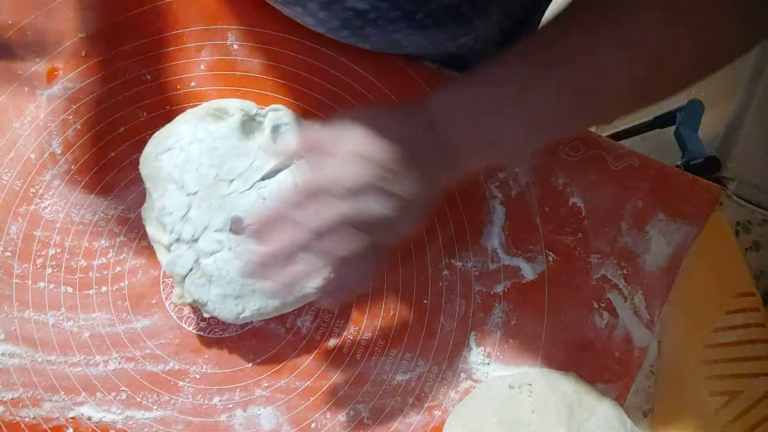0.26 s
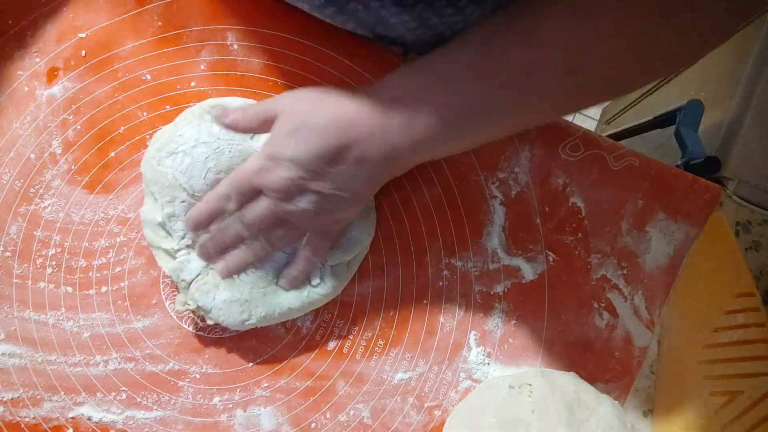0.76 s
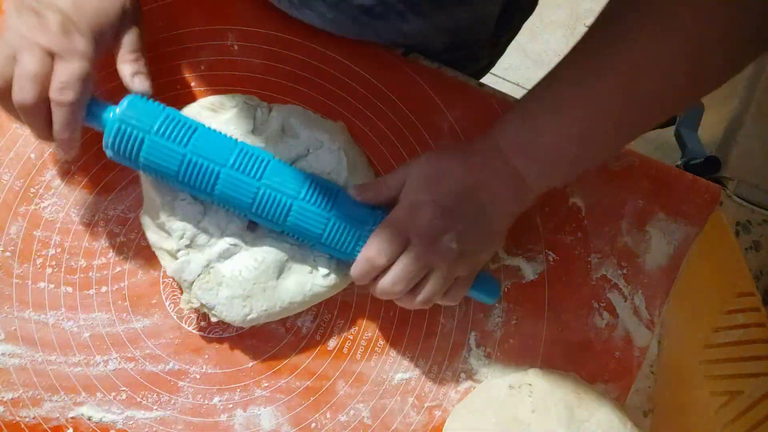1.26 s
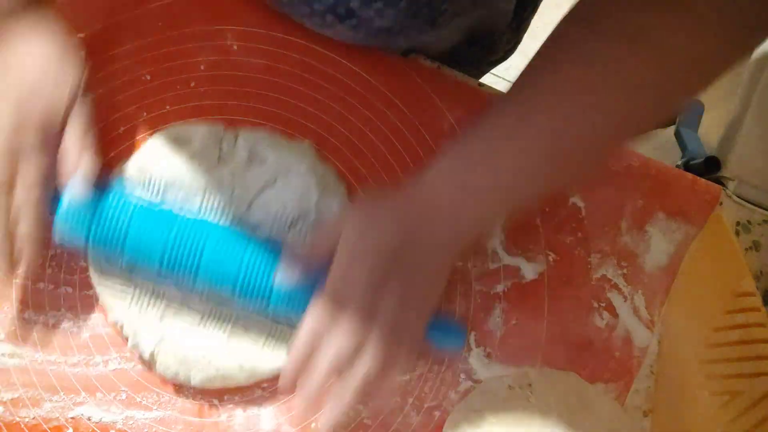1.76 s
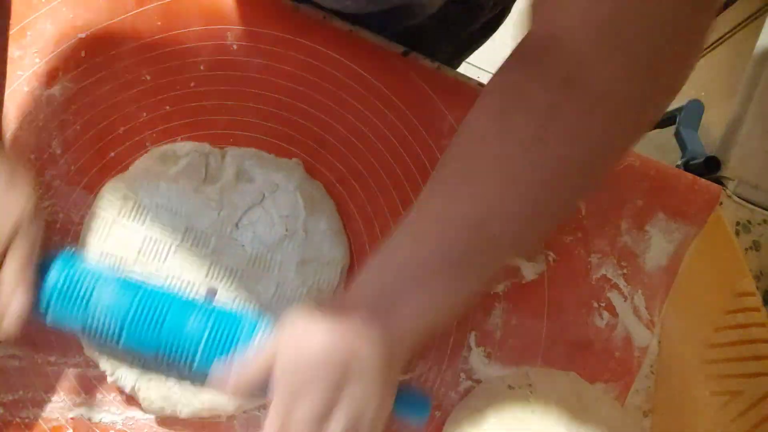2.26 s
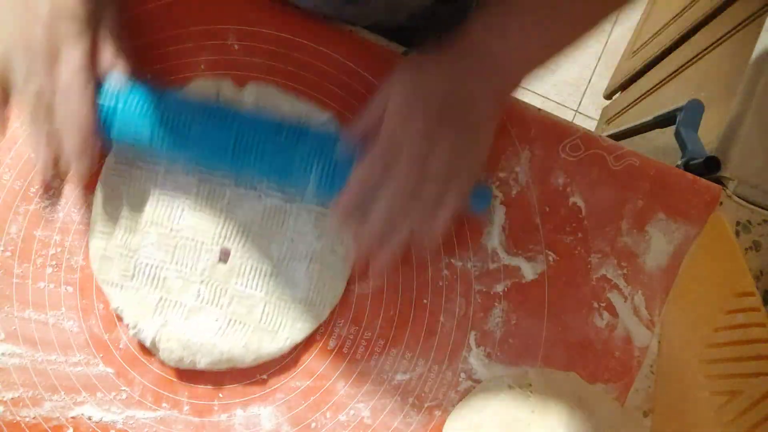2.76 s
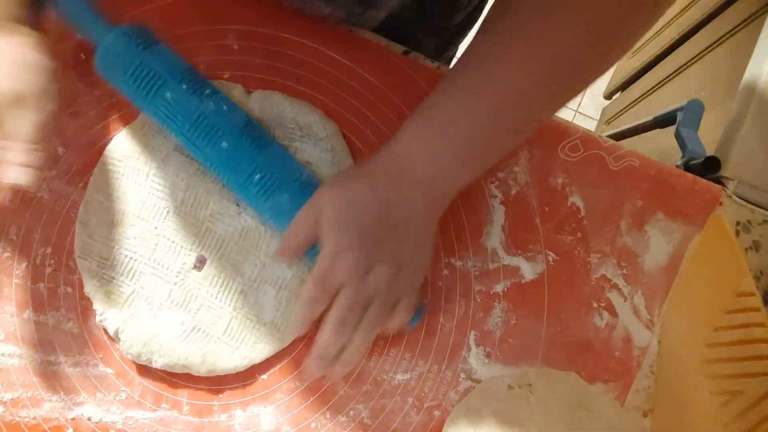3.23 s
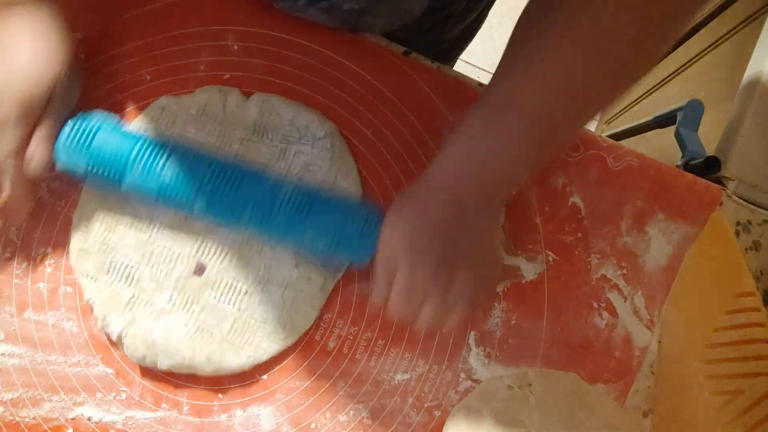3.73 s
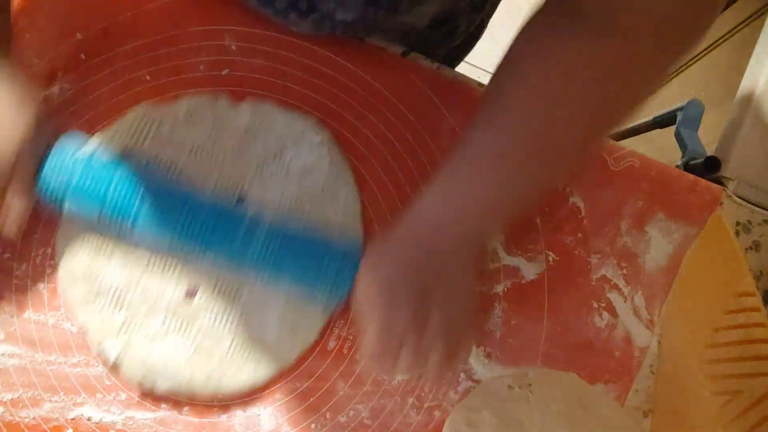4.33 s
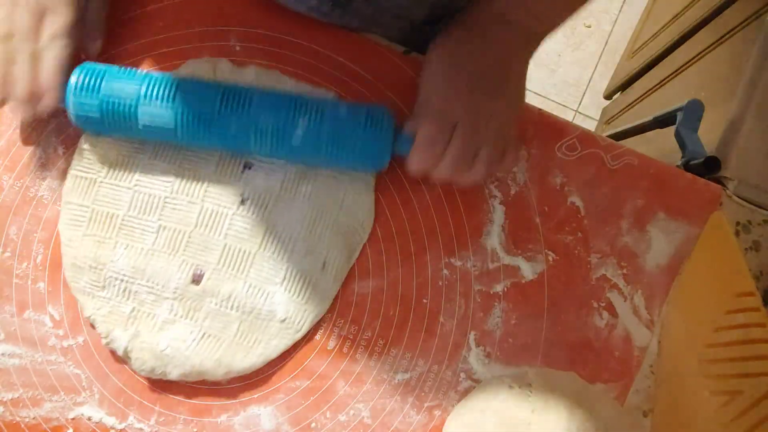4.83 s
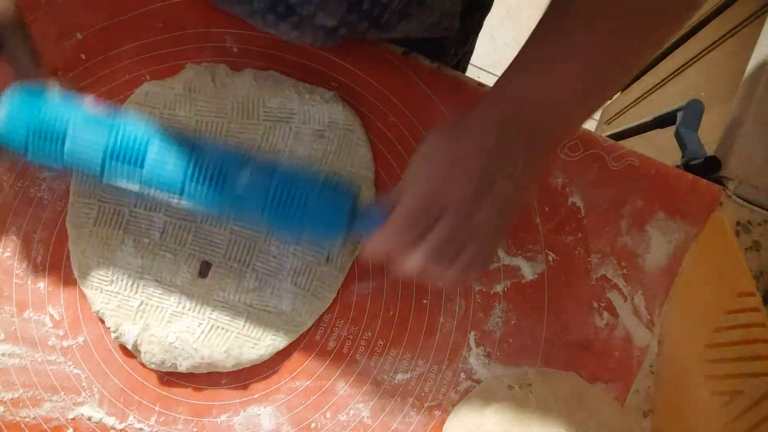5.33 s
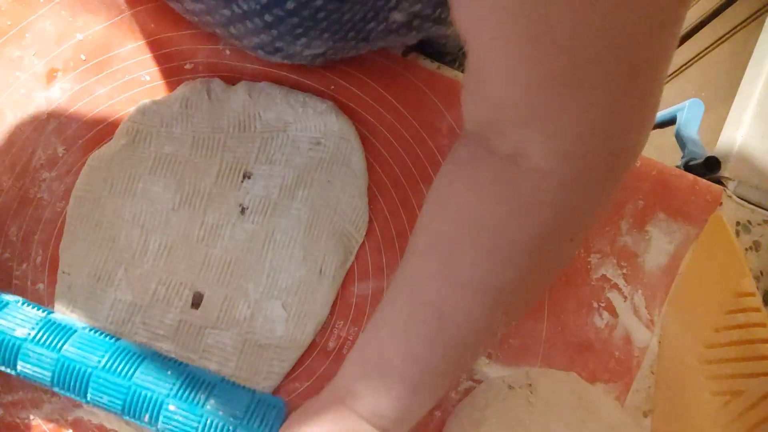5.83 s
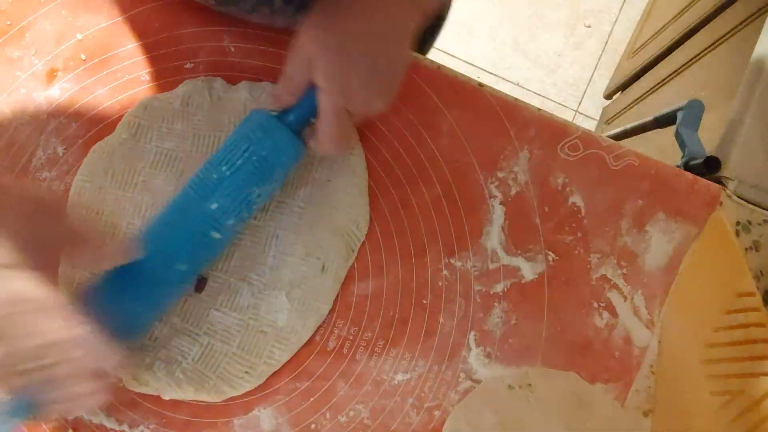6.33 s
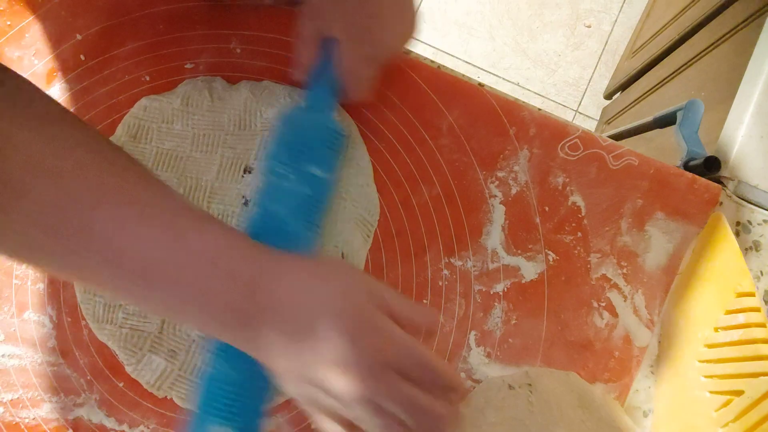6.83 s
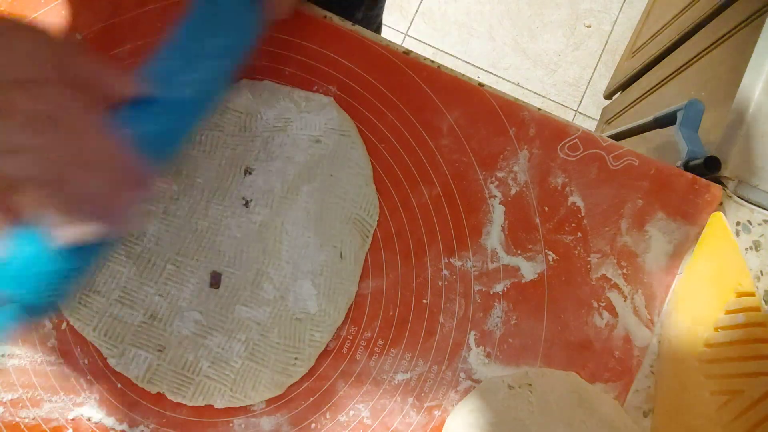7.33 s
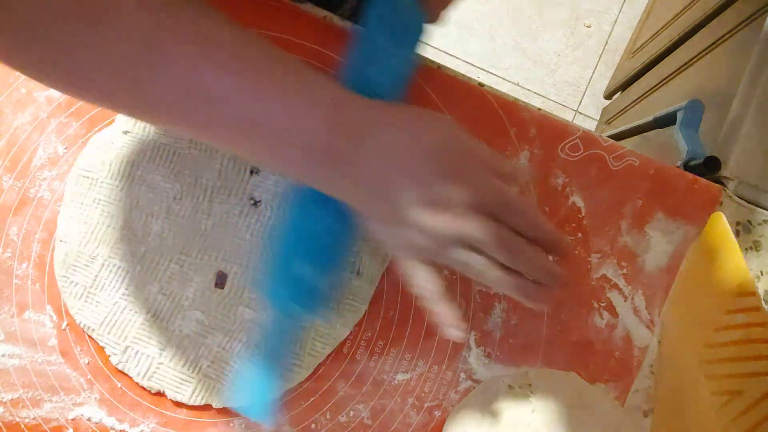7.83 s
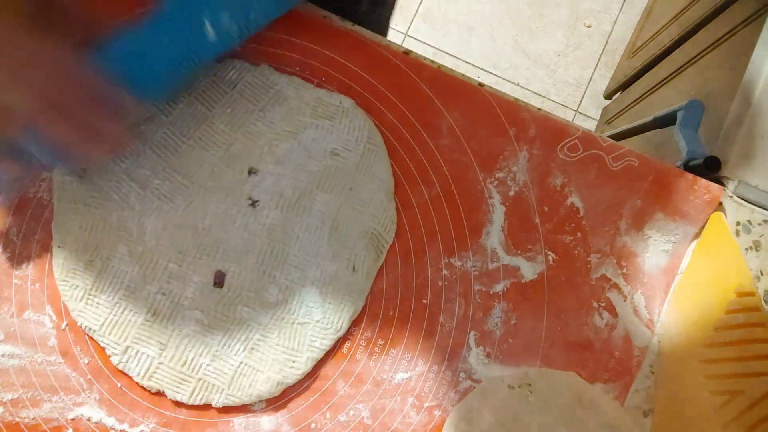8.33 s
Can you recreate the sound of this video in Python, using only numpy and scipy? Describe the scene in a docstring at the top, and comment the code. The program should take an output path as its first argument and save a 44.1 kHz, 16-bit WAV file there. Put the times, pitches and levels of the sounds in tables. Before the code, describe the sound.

A ribbed plastic rolling pin rumbles back and forth over floured dough, with hollow clacks and table thumps, above a throbbing refrigerator hum.

```python
"""A ribbed plastic rolling pin works dough on a floured mat in a kitchen, close to a phone's microphone.
Each stroke is filtered random slips: ribs rumble, the barrel rubs, flour hisses; hands pat and brush too.
Handles clack (snap and rattle through the hollow shell) and squeak (short rising tones); now and then
the pin drops and thumps the table, ringing its modes.
Behind, a compressor, probably a refrigerator's, throbs against the mains hum over a low rush of noise."""
import sys
import numpy as np
from scipy import signal
from scipy.fft import rfft, irfft, next_fast_len
from scipy.io import wavfile

SR = 44100
rng = np.random.default_rng(int(sys.argv[2]) if len(sys.argv) > 2 else 0)


def store_pcm(level_fs):
    """Save levels as 16-bit WAV."""
    pcm = np.round(np.clip(level_fs, -1, 1) * 32767).astype(np.int16)
    wavfile.write(sys.argv[1], SR, np.atleast_2d(pcm).T)


N = 378368
TIME = np.arange(N) / SR  # seconds

# Strokes of the pin over the dough. Each row: start in seconds, speeding up in seconds, slowing down in
# seconds, then rumble of the ribs, rubbing on dough and hiss of flour in dB, before the trims in rolling().
STROKES = [(0.95, 0.38, 0.16, -56, -65.5, -64), (1.31, 0.1, 0.18, -46.5, -58.5, -58.5),
           (1.579, 0.16, 0.11, -48.5, -65, -64.0), (1.834, 0.14, 0.2, -50, -65, -61.5),
           (2.14, 0.18, 0.21, -50.5, -64.5, -64), (2.515, 0.27, 0.084, -56, -69, -66.5),
           (2.864, 0.18, 0.15, -45.5, -57, -55.5), (3.6, 0.23, 0.13, -53, -63, -64),
           (3.899, 0.21, 0.085, -48, -64, -64.5), (4.176, 0.14, 0.16, -48.5, -61.5, -62.5),
           (4.48, 0.13, 0.19, -45, -62.5, -62), (4.675, 0.05, 0.21, -49.5, -56.5, -60),
           (4.86, 0.083, 0.25, -54.5, -61.5, -67), (5.36, 0.17, 0.7, -57.5, -65.5, -66.5),
           (5.868, 0.033, 0.2, -73, -67, -68), (5.977, 0.26, 0.093, -57, -64.5, -67),
           (6.303, 0.032, 0.1, -48, -62, -64), (6.369, 0.11, 0.31, -57.0, -59, -60),
           (6.858, 0.021, 0.23, -53.5, -58, -60.5), (6.94, 0.12, 0.22, -53.5, -59, -66),
           (7.335, 0.12, 0.33, -58.5, -65.5, -66.5), (7.856, 0.026, 0.2, -48, -58.5, -64),
           (7.93, 0.17, 0.56, -59.5, -69, -68)]
# Brushes of a hand over dough or pin. Each row: start in seconds, speeding up in seconds, slowing down in
# seconds, then rubbing and hiss of flour in dB, before the same trims.
BRUSHES = [(-.016, 0.014, 0.18, -63, -64), (.371, 0.17, 0.072, -79, -70), (.56, 0.011, 0.067, -76, -69.5),
           (.685, .027, 0.028, -81, -68), (.914, .014, 0.022, -67, -69), (.955, .017, 0.014, -69, -64),
           (2.483, .042, 0.071, -67, -65), (3.11, 0.034, .04, -66, -74), (3.283, 0.018, 0.1, -63.5, -67.5),
           (4.375, 0.034, 0.014, -61, -59.5), (6.64, 0.044, 0.028, -57.5, -71),
           (8.137, 0.06, 0.034, -63, -61.5), (8.275, 0.079, 0.073, -69, -62), (8.52, 0.036, .03, -70, -67)]
# Exponents of speed (no unit) by which contact power grows, in the order ribs, rubbing, flour.
SPEED_LAW = (1.21, 0.97, 1.0)
PALM_RUMBLE_DB = 5  # rumble under a brushing hand, above its rubbing
GRIP_S = 0.92  # the hands leave the dough and take the pin
# Ribs, rubbing and flour between strokes, in dB: hands pressing the dough, then the pin creeping on it.
PRESSING_DB, CREEPING_DB = (-68.5, -80.5, -83), (-66.5, -73.5, -76)
# Colours of the ribs, the rubbing and the flour. Each row: frequency in Hz, density in dB per Hz.
RUMBLE = [(60, -16.5), (150, -4.5), (300, 3), (450, 1.5), (700, -1), (900, -2), (1150, -7.5), (2000, -33),
          (8000, -56)]
RUB = [(300, -32), (800, -2.5), (1150, 4.5), (1500, 9), (2300, 4.5), (3400, -8.5), (4500, -18.5),
       (8000, -29)]
FLOUR = [(1000, -36), (2800, -4), (3900, 0.5), (5000, 1), (6200, 2.5), (7500, 5.5), (9000, -40.5)]
# Resonances of the hollow pin. Each row: frequency in Hz, width in Hz, lift in dB.
PIN = [(599, 47, 5.5), (767, 130, 5.5), (916, 96, 3), (1087, 340, -4), (1390, 50, 1.5), (1570, 51, 1.5),
       (1640, 510, -5.5), (1980, 350, -0.5), (3400, 270, 2.5)]
# Hum lines, each a sum of two rhythms. Each row: multiple of the shaft's turning, multiple of the mains
# buzz, level in dB rms.
HUM_LINES = [(2, 0, -54), (0, 1, -47.5), (3, 0, -53), (1, 1, -65), (4, 0, -60.5), (2, 1, -65.5),
             (5, 0, -57.5), (0, 2, -75), (6, 0, -55.5), (2, 2, -65.5), (8, 0, -50), (11, -1, -56.5),
             (9, 0, -61.5), (12, -1, -70), (12, 0, -76.5), (8, 2, -66.5), (7, 3, -67)]
# The compressor's turning rate. Each row: time in seconds, turns per second.
SHAFT = [(0, 36.23), (2, 36.24), (2.6, 36.29), (5, 36.315), (8.58, 36.32)]
BUZZ_HZ, THROB_AT_S = 100.02, 4.012  # mains buzz; a moment when it is in step with the shaft
# Colour of the kitchen's rush. Each row: frequency in Hz, density in dB per Hz.
ROOM = [(20, -40.5), (35, -17), (50, -9), (70, -3.5), (100, -4.5), (122, -6), (175, -1), (240, -10),
        (300, -3.5), (400, -14), (600, -18), (1100, -33.5), (3000, -47), (7500, -50.5)]
# Blows on the table. Each row: start in seconds, then in dB a push near 50 Hz, boom near 100 Hz,
# body near 180 Hz, knock near 350 Hz and rap near 620 Hz.
THUMPS = [(0.0, -22, -42, -10, -37, -46), (.374, -32, -44, -29, -27.5, -45),
          (1.236, -43, -41, -27.5, -29, -35), (2.299, -42, -35, -32, -34, -46),
          (3.0653, -18, -22, -21, -26, -31), (5.377, -43, -15.5, -22.5, -30.5, -17.5),
          (6.808, -46, -29, -41, -34, -49), (6.872, -38.5, -18, -14, -24, -35.5),
          (7.379, -23, -14, -62, -20.5, -35), (7.8956, -34, -16.5, -0.5, -14, -21.5)]
# Modes of the table. Each row: frequency in Hz, level in dB, undamped 60 dB decay in seconds.
TABLE_MODES = [(56, -4, 0.13), (74.5, -15, 0.43), (98.3, -1.5, 0.42), (133.1, -7.5, 0.33),
               (184.4, -7.5, 0.11), (220, -20.5, 0.1), (255, -17.5, 0.18), (360.5, -9, 0.14),
               (405, -7.5, 0.062), (529, -4.5, 0.062), (626.5, -13, 0.13), (850, -16.5, 0.068)]
# Clacks of the pin. Each row: start in seconds, strength in dB, strongest frequency in Hz, fall above it
# in dB per octave, rattle relative to the snap in dB.
CLACKS = [(.002, -5, 700, 8, 9.5), (0.3724, -8.5, 1800, 9, -3.5), (.376, -12, 900, 7.5, -3),
          (1.2365, -12, 600, 12, -8), (1.881, -20, 600, 6, 2), (2.639, -9.5, 620, 18, 3),
          (2.770, -12.5, 700, 14, 6), (3.055, -3.5, 1550, 25, 12), (3.063, 2, 1350, 12, 1),
          (3.071, 9, 800, 15, -2.5), (3.316, -12, 1000, 21, 4), (4.001, -21, 700, 9, -2),
          (4.039, -2, 700, 21, 1.5), (4.110, -6, 1400, 20, -1.5), (4.513, 2, 1340, 28, 0),
          (4.682, 1.5, 1300, 15.5, -1), (4.953, -6, 680, 12, 4.5), (5.095, -16, 750, 9, 8.5),
          (5.377, -7, 650, 6, 8.5), (6.021, -12.5, 1500, 12.5, 1.5), (6.273, -17.5, 700, 12, -4),
          (6.325, -27.5, 700, 2, 10), (6.808, -11, 890, 18, 1.5), (6.870, -8, 1100, 15.5, 6.5),
          (7.044, 4, 1400, 34, -5), (7.36, -5, 670, 10.5, 5.5), (7.379, -10, 662, 3.5, 3),
          (7.881, -6.5, 700, 10, 5), (7.897, -2.5, 650, 4.5, 1.5), (7.902, 4, 646, 47, -1),
          (7.978, -20, 900, 10, -7)]
LOW_SLOPE_SHARE = 0.62  # a clack falls away more gently on its bass side
CREST_OCTAVES = 0.068  # width of the rounded top of a clack's colour
# Squeaks of the handle on its axle. Each row: start in seconds, length in seconds, middle pitch in Hz,
# peak in dB.
SQUEAKS = [(1.24, .04, 5950, -56), (1.284, .03, 5970, -57.5), (1.344, .018, 6020, -58),
           (3.797, .02, 6110, -53.5), (7.455, .04, 4420, -67), (8.29, .03, 5000, -63)]
EDGE_HZ = 7680  # top of the phone's band


def amp(db):
    """Decibels to gain."""
    return 10 ** (np.asarray(db) / 20)


def unit(x):
    """Scales to rms 1."""
    return x / np.sqrt(np.mean(x ** 2) + 1e-20)


def read(points, hz):
    """Reads a spectrum on a log-frequency axis."""
    f, value = np.transpose(points)
    return np.interp(np.log(hz + 1), np.log(f + 1), value)


def colour(x, db_at):
    """Filters x, without phase shift, by a gain in dB given as a function of frequency."""
    size = next_fast_len(len(x) + 2048)
    gain = amp(db_at(np.fft.rfftfreq(size, 1 / SR)))
    return irfft(rfft(x, size) * gain, size)[:len(x)]


def struck(x, db_at):
    """Filters x by a gain in dB so that resonances ring only after their cause (minimum phase)."""
    size = 4096
    log_gain = np.log(amp(db_at(abs(np.fft.fftfreq(size, 1 / SR)))))
    response = np.fft.ifft(np.exp(np.conj(signal.hilbert(log_gain)))).real
    return signal.fftconvolve(x, response[:size // 2])[:len(x)]


def drift(rate_hz):
    """Slow random wandering of rms 1."""
    return unit(colour(rng.standard_normal(N), lambda f: -20 * np.log10(1 + (f / rate_hz) ** 4)))


def add(mix, s, sound):
    """Mixes a sound in at time s."""
    part = mix[max(round(s * SR), 0):][:len(sound)]
    part += sound[:len(part)]


def pin_db(hz):
    """The lift that the pin's shell gives to whatever excites it."""
    return sum(db / (1 + (2 * (hz - f) / width) ** 2) for f, width, db in PIN)


def friction(spectrum, per_s, spread_db, smooth):
    """Many tiny slips of uneven size over smooth sliding, heard through the pin."""
    sizes = amp(spread_db * np.minimum(rng.exponential(1, N), 4)) * rng.choice([-1, 1], N)
    slips = unit(sizes * (rng.random(N) < per_s / SR))
    sliding = smooth * rng.standard_normal(N)
    return unit(struck(slips + sliding, lambda f: read(spectrum, f) + pin_db(f)))


def speed(start, rise, fall):
    """A hand's speed, 0-1: it gathers smoothly from rest and comes smoothly back to rest."""
    return np.sin(np.pi * np.interp(TIME, np.cumsum([start, rise, fall]), [0, .5, 1])) ** 2


def contact():
    """Gains of ribs, rubbing and flour: motion adds power by its speed to that of the resting contact."""
    resting_db = np.where(TIME < GRIP_S, np.c_[list(PRESSING_DB)], np.c_[list(CREEPING_DB)])
    power = amp(resting_db) ** 2
    brushes = [(*timing, rub + PALM_RUMBLE_DB, rub, flour) for *timing, rub, flour in BRUSHES]
    for start, rise, fall, *levels in list(STROKES) + brushes:
        pace = speed(start, rise, fall)
        moving = (TIME > start) & (TIME < start + rise + fall)
        for layer, db, law in zip(power, levels, SPEED_LAW):
            layer[moving] += amp(db) ** 2 * pace[moving] ** law
    return np.sqrt(power)


def reflected(x, wet_db=-11, t60=.05):
    """Arms, table and cupboards throw back early echoes, whose pattern slowly wanders."""
    t = np.arange(SR // 10) / SR
    paths = rng.standard_normal((2, len(t))) * amp(-60 * t / t60)
    first, second = (signal.fftconvolve(x, path / np.linalg.norm(path))[:N] for path in paths)
    place = drift(rate_hz=1.3)  # radians of crossfade between the two echo patterns
    return x + amp(wet_db) * (np.cos(place) * first + np.sin(place) * second)


def rolling(rumble_db=0.75, rub_db=0.5, flour_db=2.5, uneven_db=1.8):
    """Ribs patter into the dough, the barrel rubs, and flour crunches under it; the dB trim each layer."""
    rumble, rub, flour = contact()
    pressure_db = uneven_db * drift(rate_hz=15)
    ribs = rumble * amp(rumble_db) * friction(RUMBLE, per_s=450, spread_db=2, smooth=.7)
    barrel = rub * amp(rub_db) * friction(RUB, per_s=1100, spread_db=3, smooth=1.2)
    grains = flour * amp(flour_db) * friction(FLOUR, per_s=2500, spread_db=3, smooth=1.4)
    return reflected((ribs + barrel + grains) * amp(pressure_db))


def compressor(waver_db=0.26):
    """Shaft orders and mains buzz mix; three shaft orders against one buzz beat about nine times a second."""
    turns = np.cumsum(np.interp(TIME, *np.transpose(SHAFT))) / SR
    turns = turns - np.interp(THROB_AT_S, TIME, turns)
    buzz = BUZZ_HZ * (TIME - THROB_AT_S)
    phases, out = rng.random(32), np.zeros(N)
    for shaft_order, buzz_order, db in HUM_LINES:
        k, m = round(shaft_order), round(buzz_order)
        # lines that beat together share a phase, so they are in step at THROB_AT_S
        cycle = k * turns + m * buzz + phases[(k + 3 * m) % len(phases)]
        level = np.sqrt(2) * amp(db + waver_db * drift(rate_hz=1.4))
        out += level * np.cos(2 * np.pi * cycle)
    return out


def room(level_db=-50):
    """The low steady rush of the kitchen: noise of a fixed colour."""
    return amp(level_db) * unit(colour(rng.standard_normal(N), lambda f: read(ROOM, f)))


def thumps(rise_s=0.00331, held_s=.054, damp_s=0.016):
    """Each blow rings the table's modes, weighted by where it lands, until the pressed dough damps them."""
    out, t = np.zeros(N), np.arange(SR // 4) / SR
    onset = 1 - np.exp(-(t / rise_s) ** 2)
    envelope = onset * np.exp(-np.maximum(t - held_s, 0) / damp_s)
    regions_hz = [50, 100, 180, 350, 620]
    for s, *levels in THUMPS:
        weight = list(zip(regions_hz, levels))
        for hz, db, t60 in TABLE_MODES:
            ringing = amp(db + read(weight, hz) - 60 * t / t60)
            velocity = envelope * ringing * np.sin(2 * np.pi * hz * (t - rise_s))
            add(out, s, np.gradient(velocity, t) / (2 * np.pi * hz))  # the board's acceleration radiates
    return out


def blow_db(hz, top_hz, fall_db):
    """The colour of one blow: a rounded top at top_hz, falling by the octave on either side."""
    octaves = np.log2((hz + 20) / top_hz)
    away = np.hypot(np.maximum(octaves, -LOW_SLOPE_SHARE * octaves), CREST_OCTAVES) - CREST_OCTAVES
    return np.maximum(-fall_db * away, -60)


def clacks(spread_s=.0032, rattle_t60=0.05, tail_db=-19, tail_t60=0.35, bass_hz=190):
    """The barrel strikes its axle: one sharp snap, a quick rattle and a faint tail, all through the shell."""
    out, t = np.zeros(N), np.arange(SR // 4) / SR
    fading = amp(-60 * t / rattle_t60) + amp(tail_db - 60 * t / tail_t60)
    decay = (1 - np.exp(-t / 0.0033)) * fading
    # bending waves carry the treble first; 1 kHz arrives spread_s late
    hz = np.fft.rfftfreq(len(t), 1 / SR)
    snap = irfft(np.exp(-4j * np.pi * spread_s * np.sqrt(1000 * hz)), len(t))
    for s, db, top_hz, fall_db, rattle_db in CLACKS:
        rattle = decay * rng.standard_normal(len(t))
        force = snap + amp(rattle_db) * rattle / np.linalg.norm(rattle)
        add(out, s, amp(db) * struck(force, lambda f: blow_db(f, top_hz, fall_db) + pin_db(f)))
    return signal.sosfilt(signal.butter(2, bass_hz, "highpass", fs=SR, output="sos"), out)


def squeaks(glide=0.067, waver=0.0095):
    """The dry axle sticks and slips in thin chirps that rise a little; glide and waver are shares of pitch."""
    out, wobble = np.zeros(N), waver * drift(rate_hz=200)
    for s, length, hz, db in SQUEAKS:
        u = np.linspace(0, 1, round(length * SR))
        pitch = hz * (1 + glide * (u - .5) + wobble[round(s * SR):][:len(u)])
        tone = np.sin(2 * np.pi * np.cumsum(pitch) / SR)
        add(out, s, amp(db) * np.sin(np.pi * u) * tone)
    return out


def scene():
    """Pin, table and kitchen at one microphone."""
    return (rolling() + compressor() + room() + thumps() + clacks() + squeaks())[None]


def record(dry, dip_db=-6, dip_from_hz=3600, dip_to_hz=5900, bass_hz=46):
    """The phone thins the deep bass, scoops the low treble and cuts off the top."""
    thin = signal.sosfilt(signal.butter(4, bass_hz, "highpass", fs=SR, output="sos"), dry[0])

    def scoop_db(f):
        """A dip with soft edges between two frequencies."""
        return dip_db * (np.tanh((f - dip_from_hz) / 70) - np.tanh((f - dip_to_hz) / 70)) / 2

    top_cut = signal.firwin(1023, EDGE_HZ, window=("kaiser", 9), fs=SR)
    return signal.oaconvolve(colour(thin, scoop_db), top_cut, "same")[None]


dry = scene()
out = record(dry)
store_pcm(out)
```